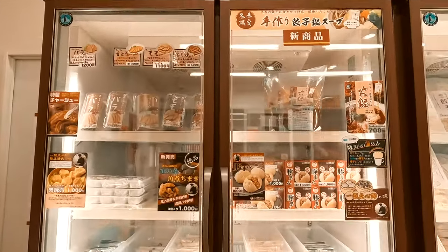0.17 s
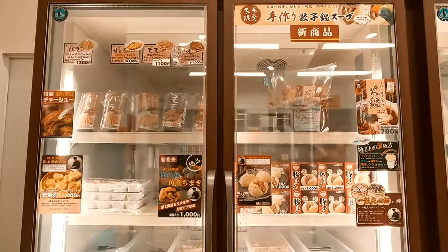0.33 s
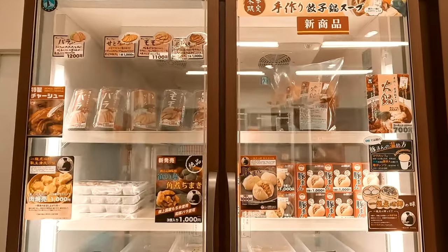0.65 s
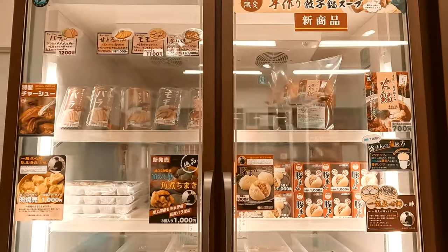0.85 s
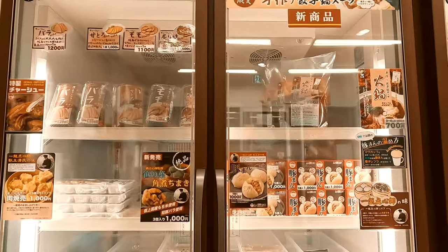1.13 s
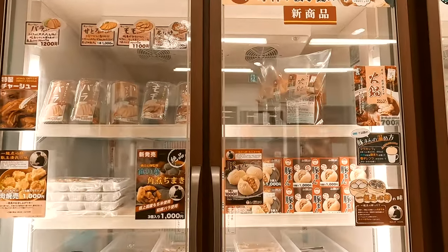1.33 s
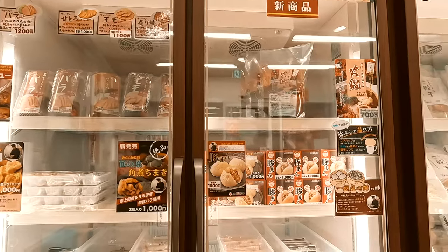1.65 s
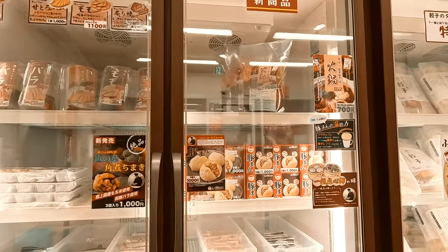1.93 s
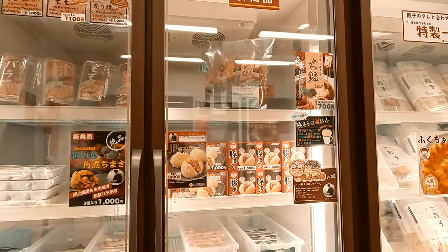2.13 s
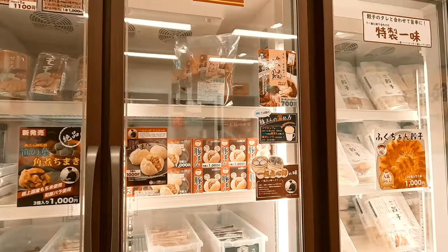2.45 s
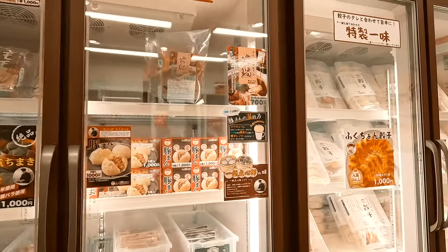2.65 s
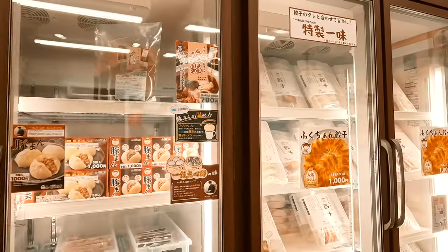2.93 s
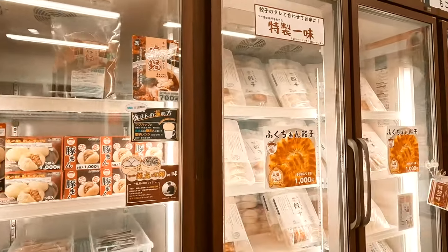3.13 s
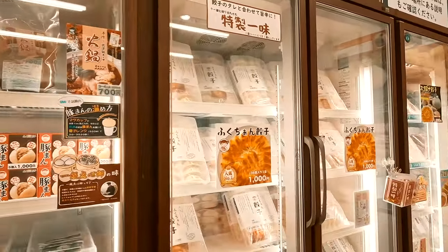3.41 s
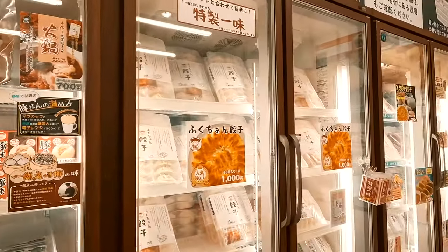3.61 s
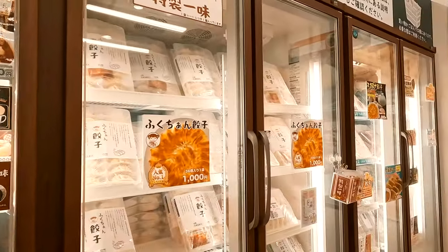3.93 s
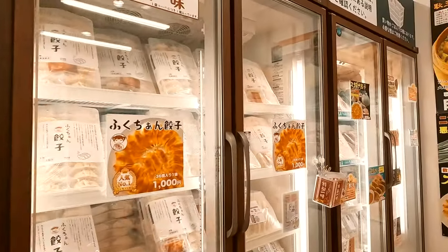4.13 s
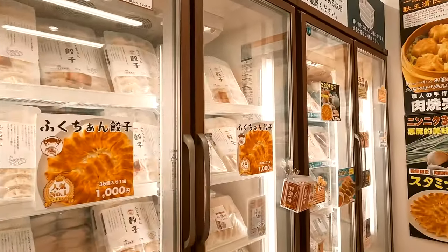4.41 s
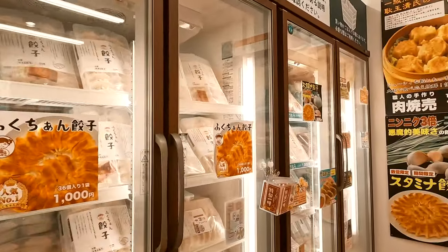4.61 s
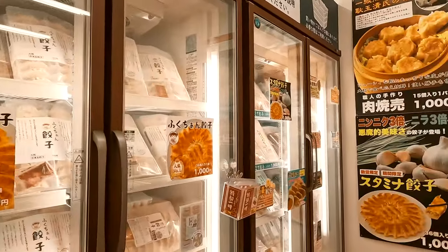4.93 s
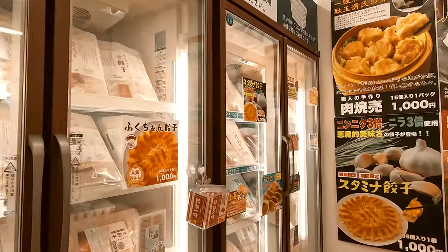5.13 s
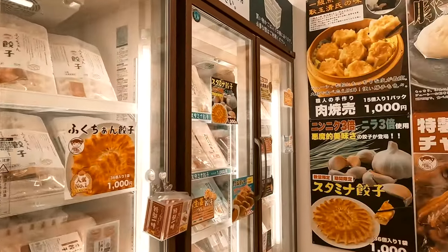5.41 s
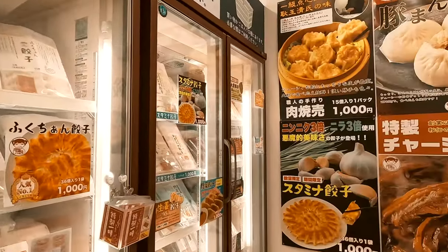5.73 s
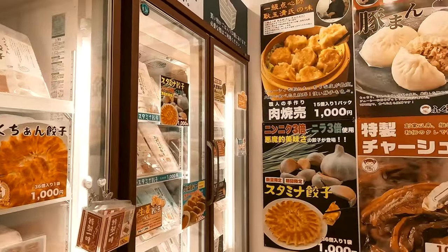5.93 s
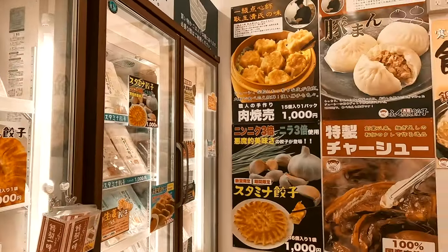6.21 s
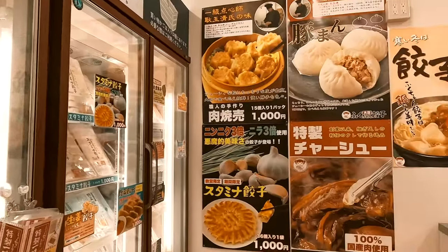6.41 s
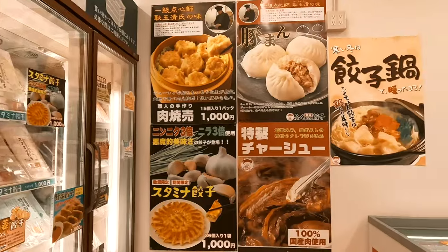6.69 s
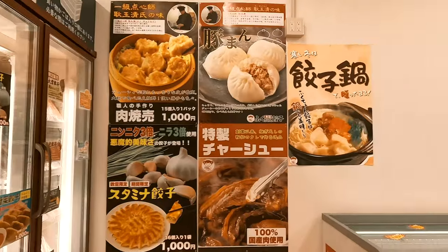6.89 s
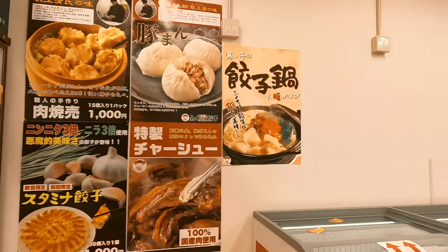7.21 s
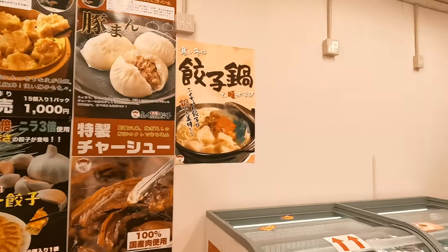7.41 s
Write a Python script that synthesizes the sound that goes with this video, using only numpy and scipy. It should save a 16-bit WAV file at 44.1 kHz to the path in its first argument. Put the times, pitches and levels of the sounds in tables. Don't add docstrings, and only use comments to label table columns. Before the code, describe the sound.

Close stereo pickup inside a small shop with running refrigeration. Heavy low hum from several compressors comes first and stays loudest, beating gently. Fans add a muffled, fairly even airflow with little hiss, and motor drives add thin high whines that swell and fade, most noticeable around the middle. A few very faint ticks occur early and halfway. In the second half a soft mid-pitched pump tone emerges and stays, creeping up very slightly. Nothing else happens.

```python
import sys
import numpy as np
from scipy import signal
from scipy.fft import rfft, irfft, next_fast_len
from scipy.io import wavfile
from scipy.ndimage import uniform_filter1d, map_coordinates

SR = 44100
rng = np.random.default_rng(int(sys.argv[2]) if len(sys.argv) > 2 else 0)


def gain_from_db(level_db):
    decades = np.asarray(level_db, float) / 20
    return 10 ** decades


def inscribe(sig):
    pcm = np.round(np.clip(np.atleast_2d(sig).T, -1, 1) * 32767)
    wavfile.write(sys.argv[1], SR, pcm.astype(np.int16))


N = 332955
T = np.arange(N) / SR
STEP = 32

# time in seconds, then first, second and third rate in Hz.
STROKE_RATES = [(0.0, 84.394, 86.479, 86.785), (1.26, 84.092, 86.518, 86.893),
                (2.52, 84.132, 86.462, 86.855), (3.78, 84.251, 86.533, 86.953),
                (5.03, 83.875, 86.572, 87.558), (6.29, 83.936, 86.496, 87.785),
                (7.55, 84.023, 86.698, 87.96)]
IN_STEP_S = [0, .201, .058]
# mean level in dB, depth in dB, loudest moment in seconds, period in seconds.
HUM_WAVES = [
    (-27.6, 1.5, 3.9, 4.8),
    (-24.7, .45, 6.0, 2.6),
    (-26.3, .95, 4.0, 4.05),
]
# mean level in dB,
# depth in dB, loudest moment in seconds (quietest where the depth is negative), period in seconds.
SECOND_WAVES = [(-44, 3, 7.4, 7), (-52, 8, 4.4, 6.5), (-47, 4.5, 4.1, 6)]
THIRD_WAVES = [(-59, 4, .3, 8.5), (-46, 5, .8, 6.3), (-51, 2.1, 7.5, 8)]
FIFTH_WAVES = [(-70.5, -2, 6, 9.5), (-58, 6, -2.5, 10), (-53.5, -4, -4.5, 10.5)]
OVERTONE_POLARITY = [(2, 1, -1, 1), (3, 1, 1, 1), (5, 1, 1, -1)]
HUM_TREND_DB_S = [-.21, .02, -.29]
SECOND_TREND_DB_S = [.3, 1.7, -2.3]

# time in seconds, level in dB.
AIR_FLOW = [(0.0, -37), (1.05, -36.5), (2.78, -38.5), (3.57, -35.5), (4.29, -39), (5.19, -37), (5.91, -39),
            (6.03, -37), (6.58, -38.5), (6.77, -37.5), (7.53, -38), (7.55, -36.5)]
# level in dB over the mean flow, growth with the flow in dB per dB.
AIR_LAYERS = [
    (3.5, 1.15),
    (-0.5, 1),
    (-14.5, .95),
]
# frequency in Hz, density in dB per Hz.
BODY_SPECTRUM = [(12, -3), (60, -4), (85, 5), (102, -2), (118, 2), (165, 1), (210, -4), (224, 2), (300, 0),
                 (530, -3), (650, -11), (1000, -16), (1400, -45), (2200, -110)]
RUSH_SPECTRUM = [(350, -28), (600, -5.5), (749, -4), (855, -5), (887, 0.5), (2490, -16.5), (2930, -20),
                 (3230, -18.5), (3500, -30), (4550, -44), (7700, -120)]
HISS_SPECTRUM = [(1500, -43.5), (2500, -12), (3600, -5.5), (4440, -11), (5830, -15), (7600, -19.5),
                 (8400, -28.5), (10400, -33.5), (12700, -42.5), (13600, -46.5), (14100, -49.5),
                 (14400, -42), (14700, -54.5), (15500, -91)]
# frequency in Hz, side minus mid in dB.
SIDE_OVER_MID = [(40, -27.5), (110, -36), (200, -30.5), (370, -16), (680, -8), (1250, -10.5), (2280, -7.5),
                 (3500, -3), (4500, -13.5), (5500, -17), (7000, -7.5), (8300, -6), (10500, -2), (12000, 0),
                 (14500, 1.5)]
# frequency in Hz, left minus right in dB.
LEFT_OVER_RIGHT = [(200, 0), (370, .8), (680, 0), (1250, 2), (4190, 1.3), (7690, 1.3), (14100, 1)]
# frequency in Hz, level in dB rms.
FAN_TONES = [(12.3, -52), (24.9, -53), (34.3, -52), (49.8, -56), (72.5, -50), (156.5, -54), (336.5, -57),
             (434, -55), (568, -59), (1705, -69), (1727, -67)]
SHAFT_TONES_HZ = [36.29, 119.97, 832, 805]
# mean level in dB, depth in dB, loudest moment in seconds, period in seconds.
SHAFT_WAVES = [
    (-42.5, 3, 1.6, 4.3),
    (-46.5, 3.5, 6.7, 6),
    (-54, 3.5, 3.2, 2.1),
    (-56, 2.5, 3.6, 3.1),
]
SHAFT_TREND_DB_S = [0, .5, 1.2, .5]

# frequency in Hz, level in dB relative to the cluster's other
LOW_CLUSTER = [(2901.6, -72.6), (3002.5, -74), (3017.3, -77.6), (3063.1, -65), (3086, -77), (3137.1, -74.6),
               (3150.6, -73), (3179.5, -68), (3205.8, -74), (3244.8, -71), (3260.9, -69), (3316, -71),
               (3353.8, -65.6), (3402.2, -70), (3441.3, -79), (3500.5, -73.4), (3530.1, -74.6)]
MIDDLE_CLUSTER = [(5804.5, -80), (5836.8, -85), (5902.8, -79), (5983.5, -90), (6003.7, -86),
                  (6104.7, -83.5), (6128.9, -84.5), (6185.4, -86), (6205.6, -82.5), (6220.4, -84),
                  (6272.9, -81.5), (6303.8, -68), (6380.6, -70), (6404.8, -68.5), (6418.2, -81),
                  (6431.7, -73), (6454.6, -80.5), (6476.1, -73), (6505.7, -74), (6560.9, -74),
                  (6589.2, -74.5), (6605.3, -79.5), (6649.7, -86), (6676.6, -82.5), (6706.2, -88.5),
                  (6737.2, -83.5), (6839.5, -88), (6852.9, -86), (7011.7, -76.5), (7037.3, -84.5)]
TOP_CLUSTER = [(9192.0, -92.5), (9205.4, -100.6), (9255.2, -99.4), (9286.2, -91.5), (9309.1, -81),
               (9336.0, -93.5), (9408.7, -92), (9422.1, -99), (9439.6, -100), (9508.3, -89), (9583.6, -81),
               (9609.2, -84), (9632.1, -84.5), (9694.0, -101.7), (9708.8, -84), (9882.4, -100.4),
               (9909.3, -92), (9961.8, -100.9)]
# mean level in dB, depth in dB, loudest moment in seconds, period in seconds.
CLUSTER_WAVES = [
    (-54.5, 2, 3.6, 3.2),
    (-57.3, 1.1, 3.5, 3),
    (-73.5, 2.5, 3.9, 4.6),
]
# centre in Hz, width in Hz, level in dB over the lines.
CLUSTER_SKIRTS = [(3120, 330, -12), (6470, 550, -4.5), (9550, 450, -2.5)]
LEAD_LINES_HZ = [3172.5, 3102.3, 3228.6, 3304.5]
# mean level in dB, depth in dB, loudest moment in seconds, period in seconds.
LEAD_WAVES = [(-57.3, 3, 3.4, 3), (-64, 5.5, 3.5, 3), (-64, 5, 3.8, 1.8), (-64.5, 3, 3.6, 2.6)]
LEAD_TREND_DB_S = [-.7, -.6, 0, 0]

# time in seconds, frequency in Hz, level in dB.
PUMP_GLIDE = [(4.3, 839, -57), (4.87, 842, -47.5), (5.2, 843.2, -44), (5.75, 844.3, -51),
              (6.15, 845.6, -43), (6.54, 846.3, -42), (6.88, 846.7, -40), (7.55, 847.6, -40)]
# time in seconds, frequency in Hz, level in dB.
LAMP_PASS = [
    (4.8, 7312, -82),
    (5.54, 7314, -76),
    (6.21, 7314, -70.5),
    (6.9, 7313, -74),
    (7.25, 7312, -84),
]
# frequency in Hz, level in dB rms.
FAINT_LAMPS = [(7290, -84), (9000, -96), (12850, -104), (12979, -105), (14291, -108), (14392, -106),
               (14491, -110), (14691, -110)]
# start in seconds, peak level in dB, centre in Hz, 60 dB decay time in seconds.
RELAY_TICKS = [
    (.65, -66, 8800, .22),
    (1.485, -63, 7700, .08),
    (3.78, -62, 7700, .08),
]


def unit(x):
    return x / np.sqrt(np.mean(x ** 2) + 1e-20)


def along(points, hz):
    f, v = np.transpose(points)
    return np.interp(np.log(hz + 1), np.log(f + 1), v)


def curves(rows):
    s, *columns = np.transpose(rows)
    return [np.interp(T, s, column) for column in columns]


def wobble(rate):
    return map_coordinates(rng.standard_normal(400), [T[::STEP] * rate])


def standing(rows, trend=0):
    mean_db, depth_db, loudest, period = np.transpose(rows)[:, :, None]
    wave_db = depth_db * np.cos(2 * np.pi * (T - loudest) / period)
    approach_db = np.reshape(trend, (-1, 1)) * (T - T.mean())
    return mean_db + wave_db + approach_db


def turbulence(gain, patchy_db):
    z = signal.stft(rng.standard_normal((2, N)), nperseg=512)[2]
    field = uniform_filter1d(rng.standard_normal(z.shape[1:]), size=5, axis=0)
    field = uniform_filter1d(field, size=14, axis=1)
    pair = signal.istft(z * gain_from_db(patchy_db * unit(field)), nperseg=512)[1][:, :N]
    m = next_fast_len(N)
    hz = np.fft.rfftfreq(m, 1 / SR)
    side_gain = gain_from_db(along(SIDE_OVER_MID, hz))
    mid, side = rfft(pair, m) * gain(hz) * [np.ones(len(hz)), side_gain]
    lean = gain_from_db(along(LEFT_OVER_RIGHT, hz) / 2)
    left, right = (mid + side) * lean, (mid - side) / lean
    return unit(irfft([left, right], m)[:, :N])


def tone(hz, fade_db, drift, apart):
    skew = apart * np.array([wobble(.7), wobble(.59)])
    fade = gain_from_db(fade_db * wobble(2.3))
    turns = drift * wobble(3) + rng.random()
    slow = fade * np.exp(2j * np.pi * turns + skew[::-1] + 1j * skew)
    carrier = np.exp(2j * np.pi * np.cumsum(hz * np.ones(N)) / SR)
    return np.sqrt(2) * (slow.repeat(STEP, axis=1)[:, :N] * carrier).real


def gliding(rows, fade_s, apart):
    hz, db = curves(rows)
    fade_in = np.clip((T - rows[0][0]) / fade_s + 1, 0, 1)
    fade_out = np.clip((rows[-1][0] - T) / fade_s + 1, 0, 1)
    return fade_in * fade_out * gain_from_db(db) * tone(hz, fade_db=.5, drift=.033, apart=apart)


def passing(lines_hz, levels_db, drift, apart):
    return sum(gain_from_db(db) * tone(hz, fade_db=2, drift=drift, apart=apart * hz / 3200)
               for hz, db in zip(lines_hz, levels_db))


def relay_ticks():
    out, t = np.zeros((2, N + SR)), T[:SR // 8]
    for s, db, hz, t60 in RELAY_TICKS:
        band = signal.butter(3, [hz * .8, hz * 1.3], "band", fs=SR, output="sos")
        mid, side = signal.sosfilt(band, rng.standard_normal((2, len(t))))
        burst = unit(np.array([mid + .4 * side, mid - .4 * side]))
        decay = gain_from_db(db - 60 * t / t60) * np.clip(t / .004, 0, 1)
        start = round(s * SR)
        out[:, start:start + len(t)] += decay * burst
    return out[:, :N]


def lamps():
    faint = sum(gain_from_db(db) * tone(hz, fade_db=2, drift=1.5, apart=.3) for hz, db in FAINT_LAMPS)
    return gliding(LAMP_PASS, fade_s=.3, apart=.2) + faint


def pump():
    return gliding(PUMP_GLIDE, fade_s=.5, apart=.12)


def drives():
    out = passing(LEAD_LINES_HZ, standing(LEAD_WAVES, LEAD_TREND_DB_S), drift=.2, apart=.3)
    clusters = LOW_CLUSTER, MIDDLE_CLUSTER, TOP_CLUSTER
    for lines, db, (centre, width, skirt_db) in zip(clusters, standing(CLUSTER_WAVES), CLUSTER_SKIRTS):
        thin = sum(gain_from_db(level) * tone(hz, fade_db=2.8, drift=.17 * hz / 3200, apart=.2) for hz, level in lines)
        skirt = turbulence(lambda hz: 1 / (1 + (2 * (hz - centre) / width) ** 2), patchy_db=3.5)
        out += gain_from_db(db - 2.5) * (unit(thin) + gain_from_db(skirt_db) * skirt)
    return out


def air_noise():
    flow_db, = curves(AIR_FLOW)
    mean_db = flow_db.mean()
    swell = wobble(3.13).repeat(STEP)[:N]
    spectra = BODY_SPECTRUM, RUSH_SPECTRUM, HISS_SPECTRUM
    swells_db, patches_db = (.058, .95, .65), (.9, .55, .85)
    air = np.zeros((2, N))
    for (db, growth), spectrum, swell_db, patchy_db in zip(AIR_LAYERS, spectra, swells_db, patches_db):
        level_db = mean_db + db + growth * (flow_db - mean_db) + swell_db * swell
        air += gain_from_db(level_db) * turbulence(lambda hz: gain_from_db(along(spectrum, hz)), patchy_db)
    return air


def fans():
    strong = passing(SHAFT_TONES_HZ, standing(SHAFT_WAVES, SHAFT_TREND_DB_S), drift=.03, apart=.5)
    steady = sum(gain_from_db(db) * tone(hz, fade_db=4, drift=.12, apart=hz / 3000) for hz, db in FAN_TONES)
    return air_noise() + strong + steady


def compressors():
    turns = np.cumsum(curves(STROKE_RATES), axis=1) / SR
    ahead = [(turn - turns[0])[round(s * SR)] for turn, s in zip(turns, IN_STEP_S)]
    turns = turns - np.array(ahead)[:, None]
    hum_db = standing(HUM_WAVES, HUM_TREND_DB_S)
    hum = np.sum(gain_from_db(hum_db) * np.cos(2 * np.pi * turns), axis=0)
    overtones_db = standing(SECOND_WAVES, SECOND_TREND_DB_S), standing(THIRD_WAVES), standing(FIFTH_WAVES)
    for db, (multiple, *sign) in zip(overtones_db, OVERTONE_POLARITY):
        shake = np.array(sign)[:, None] * np.sin(-2 * np.pi * multiple * turns)
        hum += gain_from_db(.41 * multiple) * np.sum(gain_from_db(db) * shake, axis=0)
    return np.sqrt(2) * hum


def scene():
    whines = (drives() + lamps()) * gain_from_db([[.6], [-.6]])
    lean_db = .1 * np.clip(1 - T / 5, 0, 1)
    hum = compressors() * gain_from_db([lean_db, -lean_db])
    return relay_ticks() + pump() + whines + fans() + hum


def band_limit(x):
    return signal.sosfilt(signal.butter(12, 14700, fs=SR, output="sos"), x)


def record(dry):
    return band_limit(dry)


dry = scene()
out = record(dry)
inscribe(out)
```